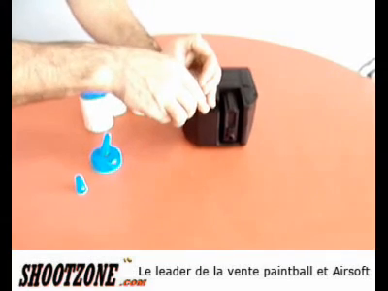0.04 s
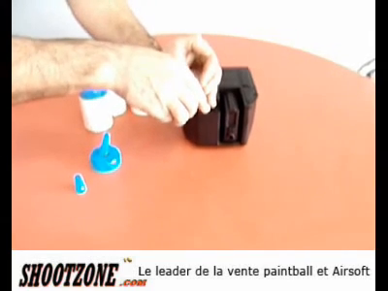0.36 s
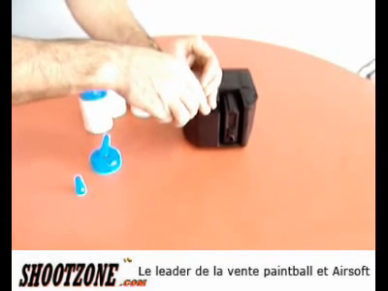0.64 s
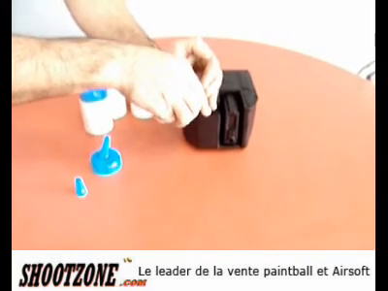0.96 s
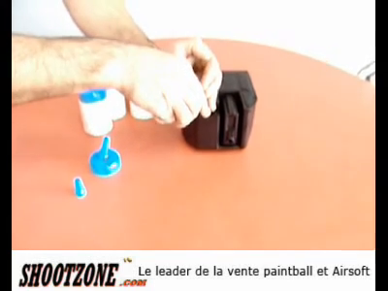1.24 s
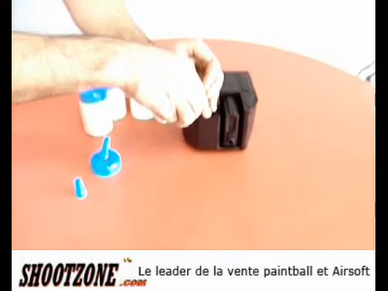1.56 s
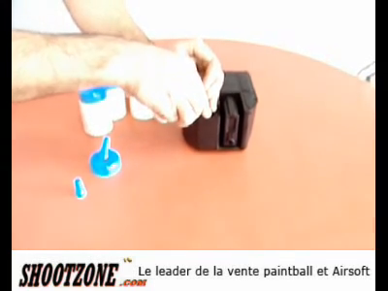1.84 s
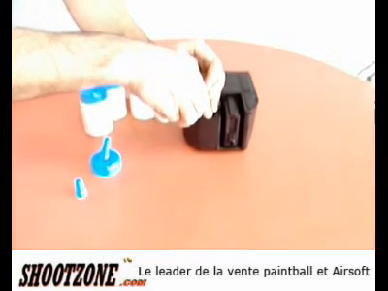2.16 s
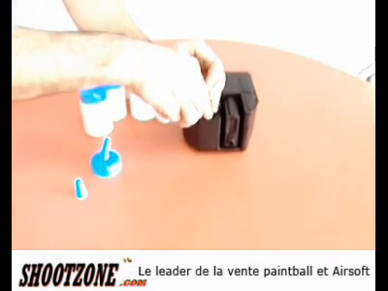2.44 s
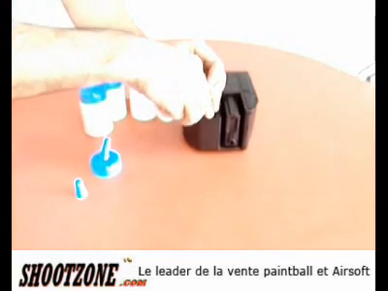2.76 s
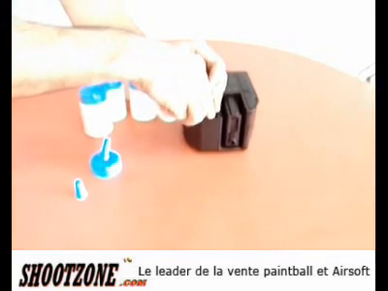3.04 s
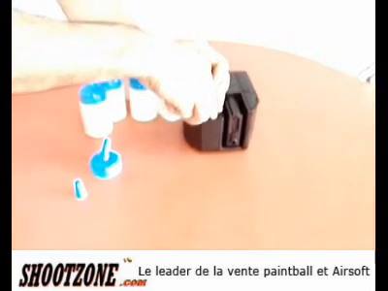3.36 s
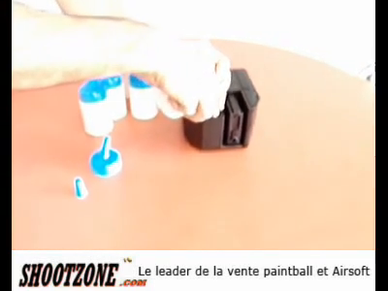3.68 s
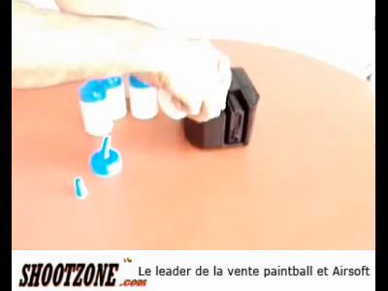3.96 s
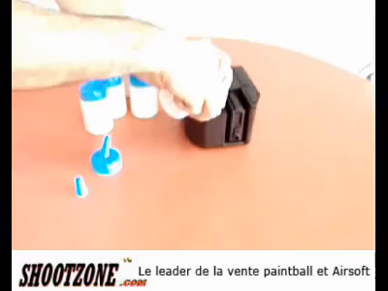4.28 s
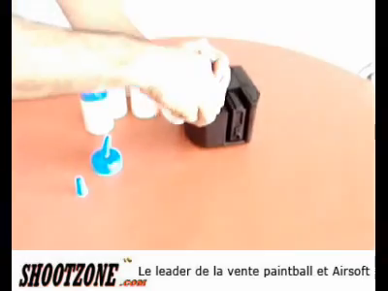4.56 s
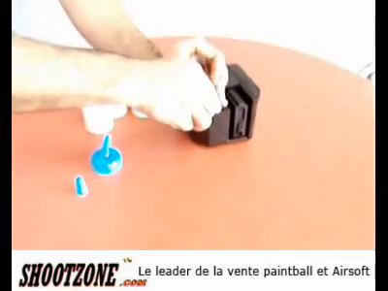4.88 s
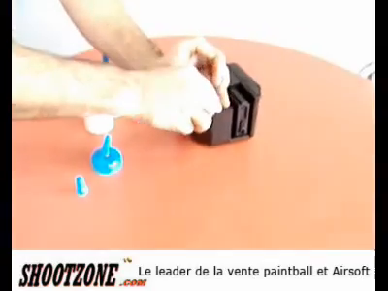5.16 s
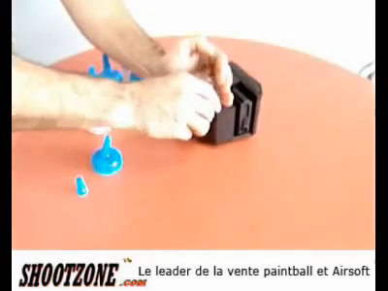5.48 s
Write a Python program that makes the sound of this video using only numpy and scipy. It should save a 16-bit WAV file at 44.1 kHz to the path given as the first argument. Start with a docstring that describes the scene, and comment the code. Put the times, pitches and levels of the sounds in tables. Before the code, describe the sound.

From the start, a hand winds the wheel of a plastic toy gun magazine, heard close up in a small room. The ratchet makes a fast, uneven stream of crisp clicks, mixed with the fine chatter of pellets in the hollow shell. The snaps are sharpest in the first second or so, then settle into a more even, slightly softer rattle whose tone shifts with the grip. The wheel catches for an instant here and there, and the hands lightly bump the body at about 0.3, 1.1, 3.8 and 4.6 seconds. The winding fades out by 5 seconds. A few separate bright clicks and taps fall between 5.1 and 5.5 seconds, then the ratcheting resumes, sounding hollower, until the end at about 5.7 seconds. A faint hum and hiss lie underneath, slowly growing louder throughout.

```python
"""A small, humming room, where a hand winds the wheel of a toy gun magazine over a table.
The pawl ticks over the ratchet teeth and stirs the plastic pellets; both click through the hollow
shell, in sharp snaps or short chatters, and the tone shifts with the grip. Now and then the hands
knock the body. The winding fades to a pause, a few single clicks fall, and it starts again."""
import sys
import numpy as np
from scipy import signal
from scipy.fft import rfft, irfft
from scipy.io import wavfile
from scipy.ndimage import uniform_filter1d, minimum_filter1d

SR = 44100
rng = np.random.default_rng(int(sys.argv[2]) if len(sys.argv) > 2 else 0)


def unload_audio(sound):
    """Save the sound as a 16-bit wav file, at the path given as the first command line argument."""
    columns = np.transpose(np.atleast_2d(sound))
    # keep every value between -1 and 1, then stretch to whole-number steps
    steps = np.round(np.clip(columns, -1, 1) * 32767)
    wavfile.write(sys.argv[1], SR, steps.astype(np.int16))


N = 252340
TAPS = 4096
HZ = np.fft.rfftfreq(TAPS, 1 / SR)
TIME = np.arange(N) / SR

# The soft noise bed of the room. Each row: frequency in Hz, relative level in dB.
AIR_SPECTRUM = [(20, -17.5), (60, -6.5), (130, -2), (200, 5.5), (300, 6), (620, 1.5), (880, 2.5),
                (1250, -3), (2500, 0.5), (4500, -13.5), (7200, -20.5), (10000, -27)]
# The tones of the hum. Each row: frequency in Hz, rms level in dB before the background gain.
HUM_TONES = [(60, -84), (100, -65.5), (102.3, -63.5), (175, -65), (199.2, -60), (244, -61), (393, -56.5),
             (490, -62), (543.7, -58.5), (802, -59.5), (1055, -58)]
# Hiss and hum slowly grow louder, as when a recorder raises its gain.
# Each row: time in seconds, gain in dB.
BACKGROUND_GAIN = [(0, -8), (1.7, -5.5), (2.8, -1), (4.3, 0.5), (5.1, 2.5), (5.72, 4.5)]
# How hard the hand winds, before and after the pause. Each row: time in seconds, level in dB.
FIRST_WIND = [(0.0, -21.5), (0.2, -27.5), (0.35, -31.5), (0.52, -27.5), (0.68, -28.5), (0.86, -25.5),
              (1.01, -24.5), (1.1, -28), (1.75, -28.5), (2.3, -30), (2.6, -33), (2.88, -33), (3.06, -29.5),
              (3.19, -25.5), (3.36, -37), (3.5, -30), (3.8, -32), (3.97, -30.5), (4.1, -33.5), (4.24, -30),
              (4.42, -31), (4.51, -29), (4.56, -35), (4.62, -34), (4.74, -34.5), (4.98, -52.5)]
SECOND_WIND = [(5.535, -33), (5.543, -47), (5.7, -24.5)]
# The clear snaps of the pawl. Each row: time in seconds, strength in dB, chatter share from 0 to 1.
PAWL_SNAPS = [(0.0236, -7, 0.2), (0.0534, -2.5, 0.3), (0.0615, 0.5, 0), (0.0777, -1, 0.28),
              (0.103, 3.5, 0.45), (0.1142, 0, 0.2), (0.1345, 2, 0.79), (0.1508, 8.5, 0.1),
              (0.1707, 3.5, 0.2), (0.221, 7, 0.2), (0.257, 0, 0.3), (0.2852, 3, 0.03), (0.3067, 3, 0.07),
              (0.335, 11, 0.12), (0.342, 3, 0.15), (0.3792, 9, 0), (0.3996, 2.5, 0.2), (0.4137, 8.5, 0.0),
              (0.4265, -4, 0.1), (0.4427, -2, 0), (0.4542, -3, 0.4), (0.4999, 5, 0.14),
              (0.5299, 10.5, 0.11), (0.5555, 3.5, 0.5), (0.5928, 2.5, 0.2), (0.6417, -1.5, 0.05),
              (0.657, 0, 0.52), (0.695, 0.5, 0.34), (0.717, 6.5, 0.3), (0.7429, 4.5, 0.1), (0.7583, 3, 0.2),
              (0.7699, 2.5, 0.43), (0.8432, 2, 0.54), (0.8567, 0, 0.84), (0.879, 2.5, 0.46),
              (0.9193, 0, 0.93), (0.979, 1.5, 0.75), (0.988, 0, 0.24), (0.9936, 1.5, 0.9),
              (1.0067, 4.5, 0.36), (1.0219, 5, 0.34), (1.0382, -6, 0.45), (1.0893, 0.5, 0.2),
              (1.1023, 9, 0.1), (1.119, -1, 0.7), (1.1303, 0.5, 0.7), (1.1594, 4.5, 0.1), (1.1753, 4, 0.5),
              (1.2112, 4.5, 0.1), (1.2376, 0, 0.1), (1.247, -0.5, 0.48), (1.2567, 0, 0.13),
              (1.281, 1.5, 0.94), (1.308, -0.5, 0.8), (1.3258, -1, 0.6), (1.3451, 0, 0.85),
              (1.3964, 4, 0.09), (1.419, 4.5, 0.4), (1.4391, -1.5, 0.26), (1.4965, 0.5, 0),
              (1.5063, -0.5, 0.86), (1.5284, 3.5, 0.6), (1.55, 4, 0), (1.5945, -8, 0.35), (1.6303, 0, 0.8),
              (1.6444, 0, 0.79), (1.6853, -3.5, 0.83), (1.6987, 2.5, 0.4), (1.7256, 1, 0.75),
              (1.7443, 1, 0.4), (1.753, 3, 0.7), (1.8332, 0.5, 0.6), (1.8513, 4.5, 0.04), (1.8784, 0, 0.57),
              (1.9099, 1, 0.51), (1.948, -2, 0.63), (1.9693, -0.5, 0.95), (2.0326, 0, 0.2),
              (2.0523, 1.5, 0.6), (2.092, 1.5, 0.66), (2.1813, -1.5, 0.6), (2.2009, 1.5, 0.06),
              (2.224, 2, 0.66), (2.272, -1.5, 0.46), (2.3, -2.5, 0.9), (2.3335, -5, 0.4),
              (2.3433, -2, 0.38), (2.3726, 0, 0.97), (2.398, -0.5, 0.39), (2.421, 2, 1), (2.4376, 0, 0.4),
              (2.4816, 0, 0.44), (2.493, -0.5, 0), (2.5223, 1, 0.2), (2.5571, 0.5, 0.76), (2.5825, 0, 0.22),
              (2.6166, 0, 0.7), (2.6266, -1.5, 0.4), (2.644, 4, 0.1), (2.6563, 1.5, 0.16),
              (2.6953, 0, 0.54), (2.7377, 1.5, 0.24), (2.7639, 0, 0.75), (2.7739, 1.5, 0.3),
              (2.823, -0.5, 0.04), (2.841, 1.5, 0.7), (2.8517, 1, 0.8), (2.872, -1.5, 0.4),
              (2.8944, -1, 0.4), (2.9343, 1.5, 0.23), (2.9603, 1, 0.9), (2.9684, 1, 0), (3.0028, 1.5, 0.7),
              (3.044, 1.5, 0.08), (3.0901, -5.5, 0.8), (3.1175, 3.5, 0.9), (3.1499, 1.5, 0.7),
              (3.1766, 0.5, 0.98), (3.202, -1.5, 0.8), (3.2245, -0.5, 0.7), (3.2502, -1.5, 0.8),
              (3.283, 0, 0.97), (3.3016, 0.5, 0.3), (3.3216, -2, 0.02), (3.3349, 1, 0.7),
              (3.3641, 0.5, 0.1), (3.3836, 0, 0.5), (3.3979, -2, 0), (3.4082, 0, 0.12), (3.4207, 2, 0.5),
              (3.4655, 0, 0.66), (3.48, 0, 0.49), (3.4977, 1.5, 0.63), (3.5073, -1, 0), (3.5499, 0, 0.8),
              (3.5823, -0.5, 0.7), (3.6036, -1.5, 0), (3.6323, 2, 0.7), (3.6439, -7, 0.69),
              (3.6724, -0.5, 0.4), (3.7015, 3, 0.71), (3.7472, 5, 0), (3.7684, 2, 0.26), (3.8334, 1.5, 0.8),
              (3.8826, 2, 0.4), (3.918, -5, 0.15), (3.9675, 1.5, 0.5), (3.9798, -1, 0.5), (4.0168, -0.5, 1),
              (4.0304, -1, 0.5), (4.087, 3, 0.75), (4.096, -5, 0.5), (4.113, -1, 0.8), (4.1337, -2.5, 0),
              (4.1732, 0, 0.5), (4.2013, 2, 0.45), (4.2723, 2, 0.4), (4.3196, 0.5, 0.11), (4.331, 0, 0.67),
              (4.358, -3, 1), (4.4049, -0.5, 0.42), (4.5274, -3, 0.7), (4.549, 1.5, 0.62),
              (4.739, -3.5, 0.66), (4.752, -0.5, 0.4), (4.7853, -2, 0.8), (4.841, -1.5, 0.2),
              (4.907, -12.5, 0.2), (4.92, -9.5, 0.42), (5.0558, -6.5, 0.17), (5.078, -13.5, 0.2),
              (5.306, -15, 0.1), (5.4692, -5, 0.08), (5.5428, -7.5, 0.2), (5.5553, -4.5, 0.3),
              (5.561, -3.5, 0.5), (5.5884, -0.5, 0.15), (5.6803, -4, 0.53), (5.6936, -1, 0.93),
              (5.7076, -0.5, 0.8)]
# The broad tone of the plastic shell. Each row: frequency in Hz, relative gain in dB.
SHELL_TONE = [(60, -52), (200, -23.5), (450, -24), (700, -21.5), (1100, -16.5), (1500, -9), (2000, -8),
              (2400, -3), (3150, -2.5), (3800, -0.5), (4450, -2.5), (5300, 0.5), (6500, 0.5), (7500, -8.5)]
# Its narrow resonances. Each row: centre in Hz, width in Hz, boost in dB.
SHELL_MODES = [(865, 270, 7.5), (1424, 210, 2.5), (1843, 164, 7.5), (2184, 99, 4.5), (2445, 78, 4),
               (2771, 234, 8), (3586, 450, 4), (4168, 430, 5.5), (4790, 300, 6.5), (5265, 250, 4),
               (5880, 430, 2.5)]
# Its bright, hollow and low rings, in that order. Each row: centre in Hz, width in Hz.
SHELL_RINGS = [(3707, 1390), (2087, 280), (1470, 2100)]
# The grip reshapes the tone. Each row: time in seconds, then bright, hollow, low and treble gain in dB.
GRIP_TONE = [(0, 10, -4.5, -3.5, -5), (0.899, 8, -3.5, -1.5, -4.5), (1.5, 6.5, -1, 1, -0.5),
             (2.1, 2.5, -2, 2.5, -1.5), (3.2, 1.5, 0, 6, 2.5), (4.35, 0.5, -1, 6, 0),
             (4.56, 2.5, -4, 7.5, -1.5), (4.8, -1.5, -6, 3, -2), (5.06, 4.5, -1, 5, -2), (5.47, 6, 2, 6, 2),
             (5.58, 2, 5.5, 9.5, 0.5), (5.7, 2.5, 16.5, 11, 5)]
# The wheel stalls for an instant. Each row: time in seconds, depth of the dip in dB.
WHEEL_STALLS = [(.322, -13), (.705, -9), (2.07, -10), (2.463, -4.5), (2.914, -3.5), (3.729, -7.5),
                (4.069, -9), (4.5, -13), (4.769, -20), (4.818, -21)]
# The hands knock the magazine, from dull bumps to bright clicks in the pause.
# Each row: start in seconds, tap level in dB, centre in Hz, width in Hz, body ring level in dB.
HAND_KNOCKS = [(.342, -13.5, 426.4, 480, -20), (0.938, -27, 79.6, 160, -40), (1.102, -12.5, 503, 606, -21),
               (2.93, -36, 69.96, 80, -44), (3.832, -14.5, 520, 596, -7), (4.5578, -5, 880, 700, -5),
               (5.1754, 5, 4900, 3800, -3.5), (5.4015, 4, 3830, 4440, -6), (5.469, 2, 2060, 950, -14)]
# The ring of the knocked body. Each row: frequency in Hz, relative level in dB, seconds to fall 60 dB.
BODY_MODES = [(807, -5.5, .07), (1015, -7, 0.077), (1472, -2, .07), (1810, -4.5, 0.094),
              (2080, -0.5, 0.055), (2400, 1, 0.053)]
# The decay of the room. Each row: frequency in Hz, seconds to fall 60 dB.
ROOM_DECAY = [(200, 0.81), (1500, 1), (4000, 0.12), (8000, 0.0067)]
# A dull top end, falling steeply above 7.2 kHz, with a faint lobe near 8.6 kHz.
# Each row: frequency in Hz, gain in dB.
TREBLE_ROLLOFF = [(6500, -6), (7200, -7), (7600, -17.5), (8000, -44), (8300, -32.5), (8650, -28.5),
                  (9100, -45), (9600, -63.5)]


def amp(db):
    return 10 ** (np.asarray(db) / 20)


def unit_rms(x):
    return x / np.sqrt(np.mean(x ** 2) + 1e-20)


def unit_energy(x):
    return x / (np.linalg.norm(x) + 1e-20)


def at_hz(points, hz):
    """Reads a table along a logarithmic frequency axis."""
    freqs, values = np.transpose(points)
    return np.interp(np.log(hz + 1), np.log(freqs + 1), values)


def add(mix, start_s, sound):
    part = mix[max(round(start_s * SR), 0):][:len(sound)]
    part += sound[:len(part)]


def bell(hz, width, order=2):
    """The curve of a resonance, height 1; a higher order has a flatter top."""
    return 1 / (1 + (2 * (HZ - hz) / width) ** order)


def minimum_phase(db):
    """Turns a gain curve into an impulse response with no pre-ring."""
    cepstrum = irfft(np.log(amp(db)))
    cepstrum[1:TAPS // 2] *= 2
    cepstrum[TAPS // 2 + 1:] = 0
    return irfft(np.exp(rfft(cepstrum)))


def through(x, response):
    return signal.oaconvolve(x, response)[:N]


def impacts(shape, per_s, spread_db):
    """A scatter of tiny blows of either sign and uneven size."""
    sizes = amp(spread_db * rng.standard_normal(shape)) * rng.choice([-1, 1], shape)
    return sizes * (rng.random(shape) < per_s / SR)


def room_tone(air_db=-45, waver=0.098):
    """A slightly wavering hum over a soft noise bed, both under one slowly rising gain."""
    air_gain = amp(at_hz(AIR_SPECTRUM, np.fft.rfftfreq(N, 1 / SR)))
    air = unit_rms(irfft(rfft(rng.standard_normal(N)) * air_gain, N))
    knots, hum = np.linspace(0, N / SR, num=30), np.zeros(N)
    for hz, db in HUM_TONES:
        drift = waver * np.interp(TIME, knots, rng.standard_normal(len(knots)))
        phase = 2 * np.pi * (hz * TIME + rng.random()) + drift
        hum += amp(db) * np.sqrt(2) * (1 + drift) * np.sin(phase)
    gain = amp(np.interp(TIME, *np.transpose(BACKGROUND_GAIN)))
    return gain * (amp(air_db) * air + hum)


def effort_db(s, pause_s=(5.1, 5.52), rest_db=-52):
    """How hard the hand winds at time s; teeth and pellets both ride this level."""
    pause = [(edge, rest_db) for edge in pause_s]
    return np.interp(s, *np.transpose([*FIRST_WIND, *pause, *SECOND_WIND]))


def strike_spots(blows, colour_db, path_s=0.00033):
    """Each blow lands on a new spot: short paths through the plastic tint it, at equal loudness."""
    t = np.arange(blows.shape[-1]) / SR
    hz = np.fft.rfftfreq(len(t), 1 / SR)
    paths = rng.standard_normal(blows.shape) * np.exp(-t / path_s) * (t > 0)
    ripple = np.sqrt(2) * rfft(paths) / np.linalg.norm(paths, axis=-1, keepdims=True)
    spectra = rfft(blows) * amp(colour_db * ripple)
    audible = amp(at_hz(SHELL_TONE, hz) + at_hz(TREBLE_ROLLOFF, hz)) ** 2
    loudness = np.sqrt(np.average(abs(spectra) ** 2, axis=-1, weights=audible)) + 1e-20
    makeup = np.linalg.norm(blows, axis=-1) / loudness
    return irfft(spectra * makeup[:, None], len(t))


def pellet_rattle(level_db=-1.5, clump_s=0.0022, uneven_db=2.1, rub_db=-13):
    """Loose pellets tumble in small clumps at uneven gaps, over the faint rub of the wheel."""
    gaps_s = rng.uniform(.004, .008, size=1300)
    sizes = amp(uneven_db * np.clip(rng.standard_normal(len(gaps_s)), -2, 1))
    t, tumble = np.arange(TAPS // 4) / SR, np.zeros(N)
    clumps = impacts((len(gaps_s), len(t)), per_s=12000, spread_db=2.0) * np.exp(-t / clump_s)
    clumps = strike_spots(np.array([unit_energy(clump) for clump in clumps]), colour_db=3.0)
    for s, size, clump in zip(np.cumsum(gaps_s), sizes, clumps):
        add(tumble, s, size * clump)
    rub = amp(rub_db) * rng.standard_normal(N)
    return amp(level_db + effort_db(TIME)) * (unit_rms(tumble) + rub)


def pawl_clicks(rows, snap_db, chatter_db, chatter_s, rise_s, scrape_db=-11, echo_db=-11):
    """Each click: a scrape up the tooth, a snap with a tiny skid, then pellets chattering together."""
    scrape_s, skid_s, echo_s = 0.0013, 0.00033, 0.0041
    t, out = (np.arange(TAPS // 3) - TAPS // 12) / SR, np.zeros(N)  # the snap falls at t = 0
    after = np.maximum(t, 0)
    scrapes, skids, chatters, echoes = impacts((4, len(rows), len(t)), per_s=10000, spread_db=2.5)
    scrapes *= np.exp(-abs(t) / scrape_s) * (t < 0)
    skids *= np.exp(-after / skid_s) * (t > 0)
    chatters *= np.exp(-after / chatter_s) * (1 - np.exp(-after / rise_s))
    # reflections off the table and the moving hands vary from click to click
    echoes *= np.exp(-after / echo_s) * (t > .001)
    blows = []
    for (_, _, share), scrape, skid, chatter, echo in zip(rows, scrapes, skids, chatters, echoes):
        hardness = np.clip(1 - share, .01, 1) ** 0.44  # more chatter, softer snap
        blow = amp(scrape_db) * unit_energy(scrape)
        blow += amp(snap_db) * hardness * unit_energy((t == 0) + unit_energy(skid))
        blow += amp(chatter_db) * np.sqrt(1 - hardness ** 2) * unit_energy(chatter)
        blows.append(blow + amp(echo_db) * unit_energy(echo))
    for (s, db, _), blow in zip(rows, strike_spots(np.array(blows), colour_db=2.0)):
        add(out, s + t[0], amp(db) * blow)
    return out


def ratchet_teeth(count=520, gap_s=.0135, jitter=.2, over_effort_db=20, spread_db=0.5):
    """The pawl slips over tooth after tooth in tight, uneven ticks, leaving room for the clear snaps."""
    times = np.cumsum(gap_s * (1 + jitter * rng.uniform(-1, 1, count)))
    uneven_db = spread_db * np.clip(rng.standard_normal(count), -2, 1)
    strength_db = effort_db(times) + over_effort_db + uneven_db
    chatter_share = np.clip(0.53 + 0.21 * rng.standard_normal(count), 0, 1)
    to_snap_s = abs(times[:, None] - np.array(PAWL_SNAPS)[:, 0]).min(axis=1)
    sounding = (to_snap_s > gap_s / 2) & (times < N / SR)
    rows = np.column_stack([times, strength_db, chatter_share])[sounding]
    return pawl_clicks(rows, snap_db=-4.5, chatter_db=2.5, chatter_s=0.0015, rise_s=0.0013)


def hollow_shell(blows, step_s=.08, mode_wander=0.25, ring_wander=0.14):
    """The shell's resonances follow the grip and wander by a share of their width as the wheel turns."""
    times, *grip_curves = np.transpose(GRIP_TONE)
    treble, out = bell(hz=4900, width=2700), np.zeros(N)
    ring_orders = (4, 2, 2)  # the bright ring has a flat top
    for s in np.arange(0, N / SR + step_s, step_s):
        *ring_db, treble_db = [np.interp(s, times, curve) for curve in grip_curves]
        colour_db = at_hz(SHELL_TONE, HZ) + treble_db * treble
        for hz, width, db in SHELL_MODES:
            colour_db += db * bell(hz + mode_wander * width * rng.uniform(-0.89, 1), width)
        for db, (hz, width), order in zip(ring_db, SHELL_RINGS, ring_orders):
            colour_db += db * bell(hz + ring_wander * width * rng.uniform(-1, 1), width, order)
        # crossfade from one colour to the next at even loudness
        loudness = np.sqrt(np.mean(amp(colour_db + at_hz(TREBLE_ROLLOFF, HZ)) ** 2))
        near = abs(TIME - s) < step_s
        grain = blows[near] * (1 - abs(TIME[near] - s) / step_s)
        add(out, TIME[near][0], signal.fftconvolve(grain, minimum_phase(colour_db) / loudness))
    return out


def wheel_catches(depth_db=-2.5, lead_s=0.013, width_s=0.0026):
    """The wheel sticks just before each snap: a gain that ducks teeth and rattle until it lets go."""
    stuck = np.zeros(N)
    before_s = np.arange(TAPS // 2)[::-1] / SR
    dip = np.exp(-((before_s - lead_s) / width_s) ** 2)
    for s, _, _ in PAWL_SNAPS:
        add(stuck, s - before_s[0], dip)
    return amp(depth_db * np.minimum(stuck, 1))


def room_reverb(x, tail_db=-11, predelay_s=.012):
    """Adds the room's short tail: sparse reflections whose treble dies first."""
    t = np.arange(SR // 2) / SR
    reflections = impacts(len(t), per_s=2500, spread_db=2.5) * (t > predelay_s)
    hz, age_s, spectra = signal.stft(reflections, SR, nperseg=256)
    decay = amp(-60 * age_s / at_hz(ROOM_DECAY, hz)[:, None])
    tail = signal.istft(spectra * decay, SR, nperseg=256)[1][:len(t)]
    return x + through(x, amp(tail_db) * unit_energy(tail))


def wheel_stalls(width_s=0.021):
    """A gain that pulls teeth and rattle down while the wheel stands still."""
    return amp(sum(db * np.exp(-((TIME - s) / width_s) ** 2) for s, db in WHEEL_STALLS))


def hand_knocks(echo_db=-2, echo_s=0.0029, low_cut_ratio=0.25):
    """Each knock: a dry tap in one broad band, quick reflections off the table, a brief body ring."""
    t, out = np.arange(TAPS) / SR, np.zeros(N)
    body = unit_energy(sum(amp(db - 60 * t / t60) * np.cos(2 * np.pi * (hz * t + rng.random()))
                           for hz, db, t60 in BODY_MODES))
    for s, db, hz, width, ring_db in HAND_KNOCKS:
        echoes = impacts(TAPS, per_s=8000, spread_db=1.5) * np.exp(-t / echo_s) * (t > .0007)
        hit = (t == 0) + amp(echo_db) * unit_energy(echoes)
        # the body hardly radiates far below the band
        low_cut = HZ ** 2 / (HZ ** 2 + (low_cut_ratio * hz) ** 2) + 1e-3
        band_db = 20 * np.log10(bell(hz, width) * low_cut)
        tap = signal.fftconvolve(hit, minimum_phase(band_db))[:TAPS]
        add(out, s, amp(db) * unit_energy(tap) + amp(ring_db) * body)
    return out


def scene():
    """Snaps and winding ring through the shell, join the knocks, and sit in the room over its hum."""
    bed = room_tone()
    snaps = pawl_clicks(PAWL_SNAPS, snap_db=-3, chatter_db=0, chatter_s=0.0056, rise_s=0.0034)
    winding = (pellet_rattle() + ratchet_teeth()) * wheel_catches() * wheel_stalls()
    magazine = hollow_shell(snaps + winding) + hand_knocks()
    return (room_reverb(magazine) + bed)[None]


def record(dry, limit_db=-7, squeeze=0.75, recovery_db_per_s=400, cutoff_hz=9500):
    """A dulled top end, a quick limiter on the hardest snaps, then a steep high cut."""
    dull = through(dry[0], minimum_phase(at_hz(TREBLE_ROLLOFF, HZ)))
    over_db = np.maximum(20 * np.log10(abs(dull) + 1e-9) - limit_db, 0)
    release_db = recovery_db_per_s * TIME
    held_db = np.maximum.accumulate(over_db + release_db) - release_db
    gain_db = uniform_filter1d(minimum_filter1d(-squeeze * held_db, size=41), size=41)
    high_cut = signal.firwin(511, cutoff_hz, window=("kaiser", 9), fs=SR)
    return signal.oaconvolve(dull * amp(gain_db), high_cut, "same")[None]


dry = scene()
out = record(dry)
unload_audio(out)
```